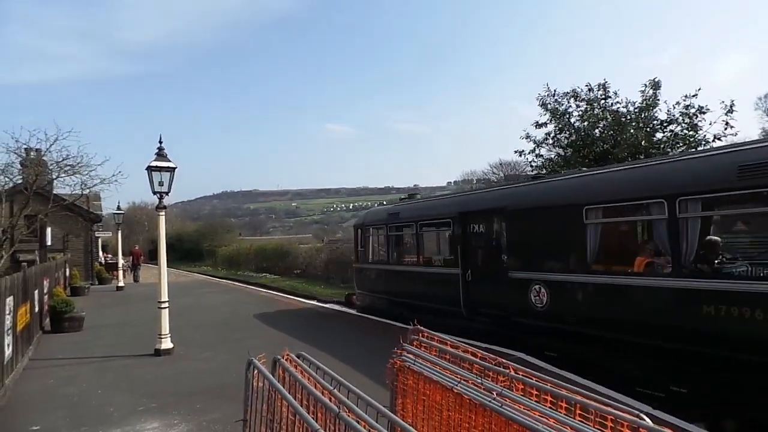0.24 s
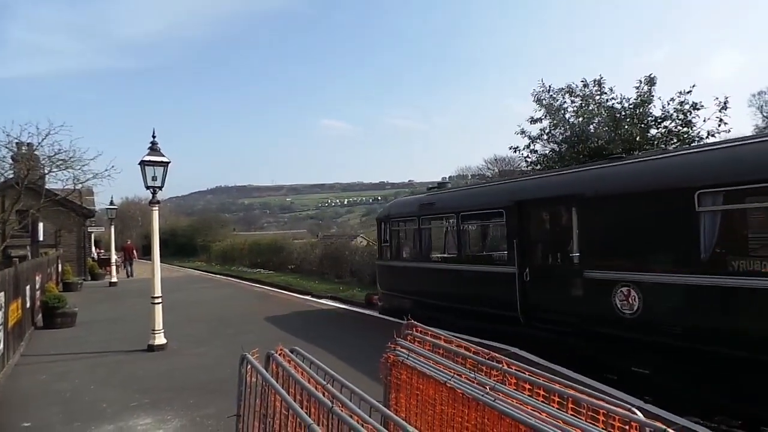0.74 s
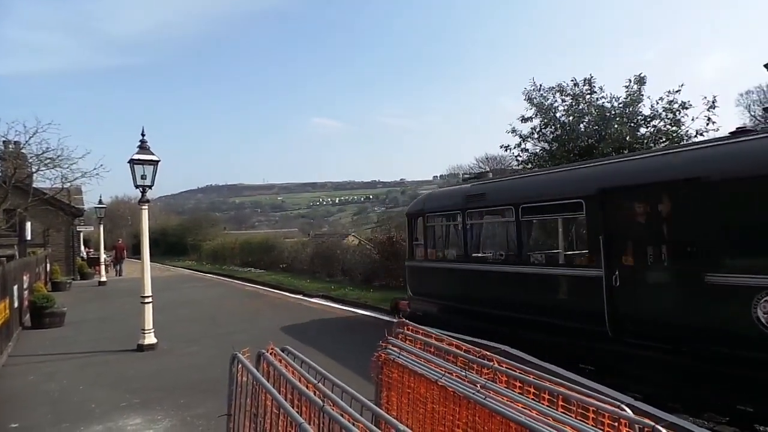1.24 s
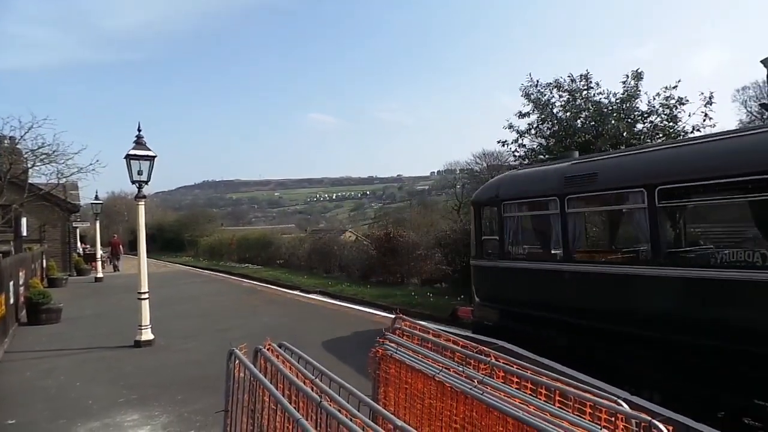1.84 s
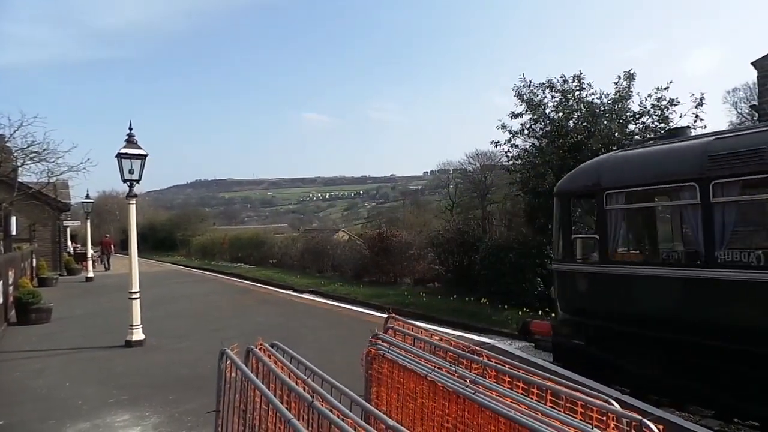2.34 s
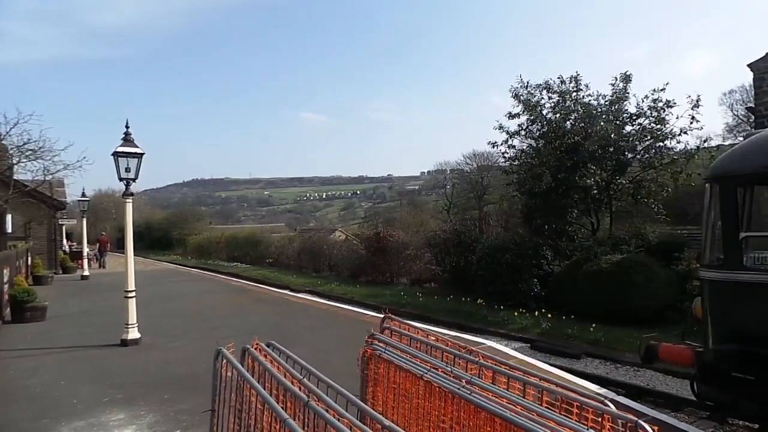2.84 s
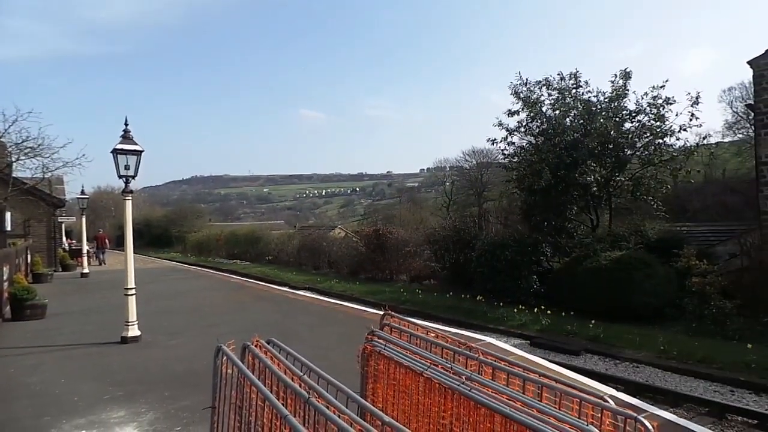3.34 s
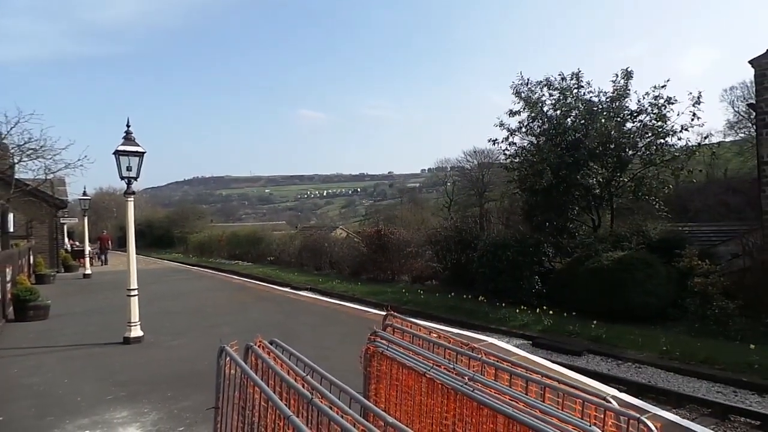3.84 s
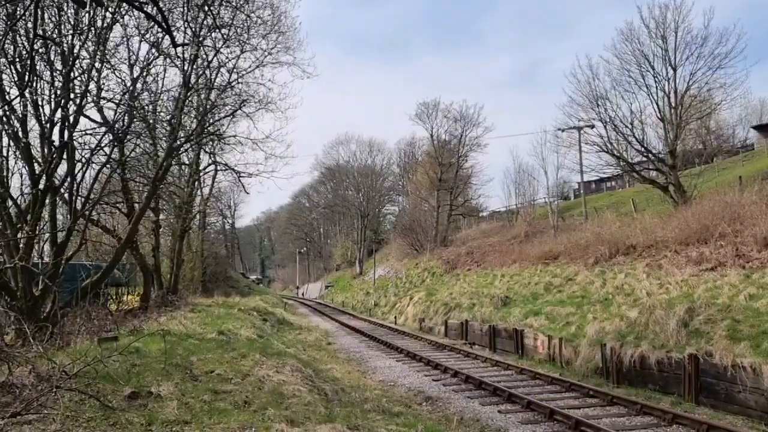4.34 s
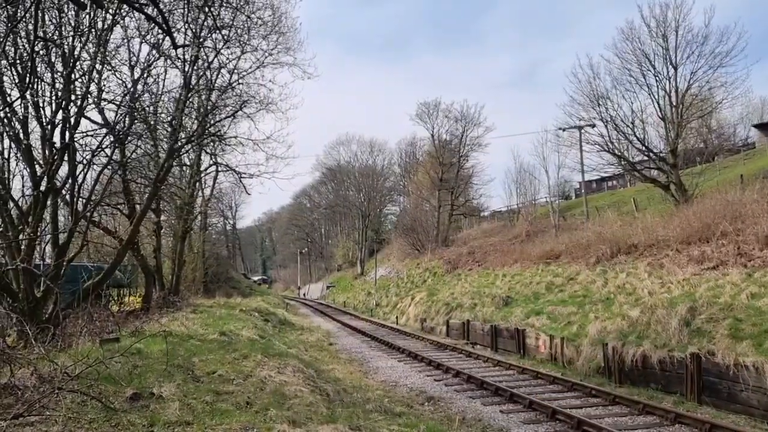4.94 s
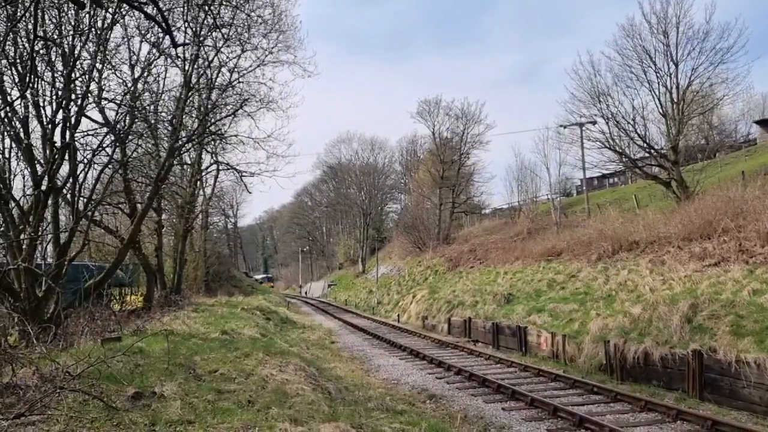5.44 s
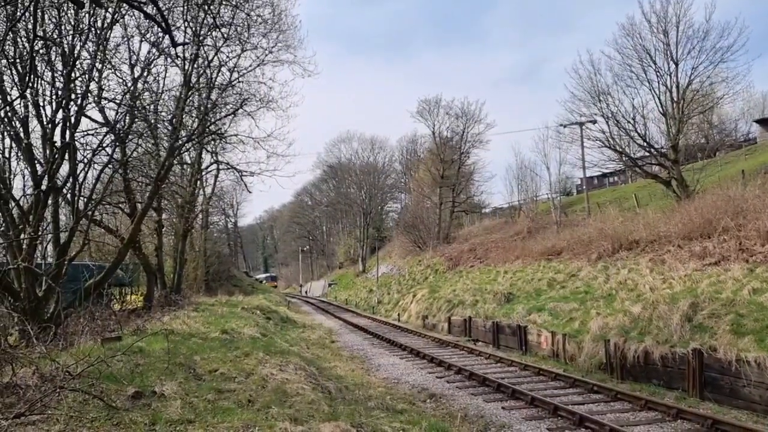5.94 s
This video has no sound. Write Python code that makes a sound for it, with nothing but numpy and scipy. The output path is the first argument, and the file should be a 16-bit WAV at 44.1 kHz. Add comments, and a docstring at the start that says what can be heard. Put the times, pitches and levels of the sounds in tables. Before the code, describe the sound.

Close beside an open station platform, a diesel railcar accelerates past. Its deep exhaust throbs and barks, climbing in pitch, with metallic engine knocking. Wheel roar, hiss and brief thin squeals build as the tail passes, and a second engine hums higher. Everything starts to fade, then cuts abruptly at about four seconds to a very quiet lineside with soft air, distant drone, tiny ticks and two birds.

```python
"""A throbbing, knocking diesel exhaust accelerates past: a two-engined railcar, metres from a platform. Rolling
wheels, their ringing and the second engine follow; then the scene cuts, with a faint click, to a quiet
lineside. There a distant drone, rustles, ticks and two birds are heard. Exhausts are harmonics of the firing
cycle, knocks are rings struck once a firing, wheels and drone are wandering resonances, rails and air are
coloured noise, birds are gliding whistles."""
import sys
import numpy as np
from scipy import signal
from scipy.fft import rfft, irfft
from scipy.io import wavfile
from scipy.ndimage import uniform_filter1d, minimum_filter1d, map_coordinates

SR = 44100
rng = np.random.default_rng(int(sys.argv[2]) if len(sys.argv) > 2 else 0)


def output_pcm(signal):
    """Save a mono or channel-first signal as 16-bit PCM at the path in sys.argv[1].

    Samples are clipped to [-1, 1] before scaling.
    """
    pcm = np.clip(np.atleast_2d(signal).T, -1, 1) * 32767
    wavfile.write(sys.argv[1], SR, np.round(pcm).astype(np.int16))


N = 273420
TIME = np.arange(N) / SR
PLATFORM_END_S, LINESIDE_START_S = 4.127, 4.153
TOP_HZ = 14300

# Lineside air and rustle spectra: (frequency [Hz], relative density [dB per Hz])
AIR_COLOUR = [(22, -2), (45, 22), (70, 17), (95, 16.5), (200, 2), (320, 0), (520, -5.5), (760, 0.5),
              (1130, -11.5), (1400, -8.5), (2900, -14), (4400, -20), (8000, -35.5), (14000, -39)]
RUSTLE_COLOUR = [(90, -12), (160, 3), (320, 1), (520, -5), (760, -3), (1100, -14), (1400, -7), (3000, -22),
                 (6000, -36)]
# Mean levels of the air and the distant drone: (time [s], level [dB])
AIR_LEVEL = [(4.33, -52), (4.6, -53.5), (5.1, -55), (5.55, -51.5), (5.8, -52)]
DRONE_LEVEL = [(4.3, -52), (4.41, -61), (4.53, -50), (4.85, -46.5), (5.3, -54.5), (6.2, -51.5)]
# Drone resonances: (frequency [Hz], width [Hz], relative level [dB])
DRONE_MODES = [(68, 2.4, 2.5), (58.5, 3, -7), (154, 10, -13.5), (314, 21, -23), (373, 25, -22),
               (716, 49, -25.5)]
# Soft stirrings of the air: (time [s], half-length [s], level [dB])
RUSTLES = [(4.355, .025, -63), (5.496, .028, -59), (5.6, .025, -64.5), (5.72, .03, -64)]
# Dry ticks, the first a faint click just as the scene cuts: (time [s], level before the gain in ticks() [dB],
# brightest frequency [Hz])
TICKS = [(4.1596, -69.5, 2580), (4.4002, -50, 4450), (5.9948, -53, 2700)]
# Small bird's thin falling notes and short chips, farther bird's fluted notes:
# (time [s], length [s], start before scoop [Hz], end before scoop [Hz], level [dB])
THIN_NOTES = [(4.15, 0.059, 6960, 6120, -76), (4.28, 0.11, 6660, 6100, -66), (4.438, 0.12, 6500, 6040, -64),
              (4.605, 0.11, 6720, 5940, -66.5)]
CHIPS = [(5.145, 0.033, 7800, 6620, -77), (6.002, .046, 7850, 5900, -67), (6.05, 0.027, 7350, 6770, -77)]
FLUTE_NOTES = [(4.24, 0.058, 1665, 1570, -67), (4.34, 0.18, 1714, 1630, -69),
               (4.515, 0.038, 1370, 1337, -69), (4.555, .035, 1623, 1594, -73.5),
               (4.61, 0.041, 1990, 1890, -70), (4.655, 0.037, 1650, 1620, -70),
               (4.91, .05, 2160, 2220, -75.5), (4.93, 0.17, 2300, 2490, -70),
               (5.06, 0.087, 2440, 2390, -69), (5.315, 0.052, 2120, 2096, -71),
               (5.435, 0.038, 2690, 2630, -69), (5.63, 0.064, 2670, 2680, -70.5),
               (5.715, 0.037, 2340, 2250, -71.5), (5.795, 0.04, 2180, 2155, -64),
               (5.86, 0.092, 2080, 2060, -71)]

# Rolling, rails under each bogie, clatter, hiss, knock: (frequency [Hz], relative density [dB per Hz])
ROLL_COLOUR = [(22, -25.5), (40, -2), (65, -1), (90, 4), (150, 7.5), (260, 5), (340, 6), (430, 0.5),
               (600, 0), (800, -5.5), (1200, -23)]
FRONT_RAIL_COLOUR = [(500, -20.5), (720, 8.5), (900, 8.5), (1030, -2), (1250, -7), (1800, -43)]
REAR_RAIL_COLOUR = [(400, -20.5), (525, 1), (580, -6.5), (660, 3.5), (810, 0), (940, 3), (1030, -1),
                    (1140, 2.5), (1300, -8), (1800, -38.5)]
CLATTER_COLOUR = [(1000, -29), (1500, 2), (1900, 2), (2200, -4.5), (2550, -4.5), (3100, -17), (4500, -45)]
HISS_COLOUR = [(1800, -13), (3000, 1.5), (4200, -1.5), (4900, -3), (5350, -1), (5800, -3.5), (8500, -5),
               (10000, -8.5), (11000, -15), (12000, -25.5), (14000, -40)]
KNOCK_COLOUR = [(700, -20.5), (1000, -1), (1150, -1), (1320, 4), (1480, -6), (2000, -21), (3500, -49)]
# Ringing wheel modes: (frequency [Hz], width [Hz], relative level [dB])
WHEEL_MODES = [(736, 16, -2.5), (691, 26, -5)]
# Brief singing of the wheels: (time [s], half-length [s], upper mode [dB], lower mode [dB])
SQUEALS = [(2.438, 0.026, -20, -40), (2.53, .035, -26, -27.5), (2.79, 0.02, -22.5, -42),
           (2.855, 0.021, -21.5, -40), (2.93, 0.014, -25.5, -36), (3.028, 0.011, -22, -36),
           (3.113, .028, -17.5, -33), (3.187, 0.026, -18.5, -22.5), (3.5, .02, -28, -27),
           (3.608, 0.019, -21, -22), (3.699, 0.033, -19.5, -23.5), (3.84, 0.041, -36, -27)]
# Hissing scrapes of steel on steel: (time [s], half-length [s], level [dB])
SCRAPES = [(0.204, 0.048, -43), (0.493, 0.024, -36), (.62, .03, -37.5), (0.83, 0.062, -36),
           (0.959, 0.032, -35), (1.81, 0.031, -37), (3.62, 0.028, -37), (3.864, 0.016, -34)]
# Leading and second engine: (time [s], firing rate [Hz])
FRONT_FIRING = [(0, 45.75), (0.11, 46.9), (0.52, 48.82), (1.37, 54.97), (1.94, 58.75), (2.57, 63.28),
                (3.05, 66.04), (3.35, 67.76), (3.65, 69.14), (3.9, 69.9), (4.12, 66.6)]
REAR_FIRING = [(2.7, 71.56), (3.5, 76.8), (3.83, 77), (4.1, 72.9)]
# Engine rattle, rising as it gathers speed: (time [s], centre [Hz])
RATTLE_PITCH = [(.7, 1079), (1.3, 1187), (1.9, 1294), (2.6, 1343)]
# Engine block modes rung by combustion: (frequency [Hz], relative level [dB])
BLOCK_MODES = [(1040, -4), (1180, 1), (1320, -1.5), (1560, -8.5), (1880, -5.5), (2500, -14.5)]
# Exhaust boom along the platform: (time [s], firing tone [dB], octave [dB])
BOOM = [(0, -17.5, -25), (.25, -16, -23), (.55, -18, -37), (.75, -19.5, -26), (.95, -22.5, -28),
        (1.35, -18, -19.5), (1.72, -18, -13), (2.1, -19.5, -17), (2.45, -27, -15.5), (2.72, -32, -18),
        (3.05, -28, -27.5), (3.35, -25, -24), (3.62, -25, -42), (4.1, -29.5, -25)]

# Pass-by of each source: abreast time, level there, rise and fall time scales, sideways beaming exponent
ROLL_PASS = dict(at_s=3.16, db=-19.5, rise_s=1.48, fall_s=0.66)
FRONT_BOGIE_PASS = dict(at_s=1.16, db=-27, rise_s=0.71, fall_s=0.98)
REAR_BOGIE_PASS = dict(at_s=3.45, db=-21, rise_s=0.64, fall_s=0.37)
CLATTER_PASS = dict(at_s=2.83, db=-27, rise_s=1.0, fall_s=1.9)
HISS_PASS = dict(at_s=2.22, db=-33.5, rise_s=1.17, fall_s=3.7)
RING_PASS = dict(at_s=0.9, db=-28.5, rise_s=0.8, fall_s=1.45, beam=2.4)
SING_PASS = dict(at_s=3.2, db=-29.5, rise_s=1.24, fall_s=0.9, beam=2.6)
REAR_PASS = dict(at_s=3.494, db=-21.5, rise_s=0.33, fall_s=0.56, beam=2.45)
REAR_HUM_PASS = dict(at_s=3.45, db=-27.5, rise_s=0.25, fall_s=0.43, beam=2.7)
BEAT_PASS = dict(at_s=1.77, db=-23.8, rise_s=1.0, fall_s=1.0, beam=2.65)
RATTLE_PASS = dict(at_s=2.05, db=-30, rise_s=0.6, fall_s=0.4, beam=2.2)
KNOCK_PASS = dict(at_s=2.74, db=-26.3, rise_s=0.55, fall_s=1.7)
HUM_PASS = dict(at_s=1.8, db=-25.5, rise_s=0.51, fall_s=0.48, beam=2.2)
THROB_PASS = dict(at_s=1.5, db=-7, rise_s=2.3, fall_s=1.5, beam=2.2)
BARK_PASS = dict(at_s=0.73, db=-15, rise_s=0.83, fall_s=0.52, beam=2.3)

SING_HIGH_HZ, SING_LOW_HZ, SING_LOW_REL_DB = 732.6, 667, -6
PIPE_HZ, PIPE_WIDTH_HZ = 163, 31
TAIL_S, TAIL_DB_PER_S = 3.645, 13


def undb(db):
    """Decibels to gain."""
    return 10 ** (np.asarray(db) / 20)


def unit(x):
    """Scale to rms 1."""
    return x / np.sqrt(np.mean(x ** 2))


def curves(table):
    """Table columns as signals, linear in time."""
    s, *columns = np.transpose(table)
    return [np.interp(TIME, s, column) for column in columns]


def walk(rate_per_s):
    """Smooth random wander of rms 1, about rate_per_s changes a second."""
    points = rng.standard_normal(4096)
    return unit(map_coordinates(points, [TIME * rate_per_s], order=3, mode="wrap"))


def noise(colour):
    """Gaussian noise of rms 1, its spectrum shaped by (frequency [Hz], density [dB])."""
    hz, db = np.transpose(colour)
    f_hz = np.arange(N // 2 + 1) * SR / N
    shape = undb(np.interp(np.log(f_hz + 1), np.log(hz), db))
    low_cut = f_hz > hz[0] / 2
    high_rolloff = 1 + (f_hz / hz[-1] / 2) ** 2
    return unit(irfft(rfft(rng.standard_normal(N)) * shape * low_cut / high_rolloff, N))


def ringing(modes):
    """Randomly pushed resonances, rms 1 in sum: each wanders in phase and a little in strength."""
    out = 0
    for hz, width_hz, db in modes:
        swing = walk(2 * width_hz) + 1j * walk(2 * width_hz)
        swing = swing / (np.abs(swing) + 0.32)  # evens out the strength
        phase = 2 * np.pi * np.cumsum(hz * np.ones(N)) / SR
        out = out + undb(db) * unit(np.real(swing * np.exp(1j * phase)))
    return unit(out)


def passing(at_s, db, rise_s, fall_s, beam=1):
    """Gain of a source going by: one over its distance, steeper if it beams sideways."""
    along = (TIME - at_s) / np.where(TIME < at_s, rise_s, fall_s)
    return undb(db) / np.hypot(1, along) ** beam


def with_flares(gain, flares):
    """Gain joined in power by Gaussian flares (time [s], half-length [s], level [dB])."""
    power = gain ** 2
    for s, half_s, db in flares:
        flare = undb(db) * np.exp(-((TIME - s) / half_s) ** 2 / 2)
        power = power + flare ** 2
    return np.sqrt(power)


def air():
    """Still country air: coloured noise, gently wandering in level."""
    return undb(curves(AIR_LEVEL)[0] + 1.1 * walk(14)) * noise(AIR_COLOUR)


def rustles():
    """Air stirring softly: brief swells of noise."""
    return with_flares(0, RUSTLES) * noise(RUSTLE_COLOUR)


def drone():
    """Far-off drone: randomly pushed resonances."""
    return undb(curves(DRONE_LEVEL)[0] + 1.3 * walk(18)) * ringing(DRONE_MODES)


def ticks(decay_s=0.002, gain_db=-7):
    """Tiny snaps: decaying noise bursts, each with its own brightness."""
    out = 0
    for s, db, hz in TICKS:
        envelope = (TIME >= s) * np.exp(-np.abs(TIME - s) / decay_s)
        colour = [(0.6 * hz, -20), (hz, 0), (1.5 * hz, -9), (3 * hz, -26)]
        out = out + undb(db + gain_db) * envelope * noise(colour)
    return out


def bird(notes, scoop, waver, echo_db, echo_t60_s, bend=2):
    """Whistles that scoop up, then settle (bend > 1) or dive (bend < 1), scattered back by the trees."""
    song, wobble = np.zeros(N), 1 + waver * walk(300)
    for s, length_s, start_hz, end_hz, db in notes:
        along = np.clip((TIME - s) / length_s, 0, 1)
        glide_hz = end_hz + (start_hz - end_hz) * (1 - along) ** bend
        hz = glide_hz * (1 - scoop * np.exp(-along / 0.054))
        swell = np.sqrt(4 * along * (1 - along))
        song += swell * undb(db) * np.sqrt(2) * np.sin(2 * np.pi * np.cumsum(hz * wobble) / SR)
    trees = rng.standard_normal(N) * undb(-60 * TIME / echo_t60_s)
    echo = signal.fftconvolve(song, trees / np.linalg.norm(trees))[:N]
    return song + undb(echo_db) * echo


def lineside():
    """Still air, rustles, ticks, a far-off drone and two birds."""
    thin = bird(THIN_NOTES, scoop=0.14, waver=0.005, echo_db=-17, echo_t60_s=0.3)
    chips = bird(CHIPS, scoop=0.06, waver=0.012, echo_db=-7, echo_t60_s=0.35, bend=0.6)
    flute = bird(FLUTE_NOTES, scoop=0.03, waver=0.018, echo_db=-2, echo_t60_s=0.55)
    return air() + rustles() + drone() + ticks() + thin + chips + flute


def rolling():
    """Wheels rolling: low coloured noise, unsteady in level."""
    return passing(**ROLL_PASS) * undb(1.0 * walk(25.03)) * noise(ROLL_COLOUR)


def rails(shake):
    """Two bogies roaring on the rails: a noise band each, shaken at the firing rate."""
    front = passing(**FRONT_BOGIE_PASS) * noise(FRONT_RAIL_COLOUR)
    rear = passing(**REAR_BOGIE_PASS) * noise(REAR_RAIL_COLOUR)
    return (1 + 0.07 * shake) * (front + rear) * undb(0.8 * walk(40))


def clatter(shake):
    """Running-gear clatter: a noise band shaken at the firing rate."""
    return (1 + 0.092 * shake) * passing(**CLATTER_PASS) * noise(CLATTER_COLOUR)


def hiss():
    """Steady high hiss, flaring in scrapes of steel on steel."""
    return with_flares(passing(**HISS_PASS), SCRAPES) * undb(0.5 * walk(70)) * noise(HISS_COLOUR)


def squeals(waver_rad=0.52, flutter_db=2.15):
    """A slipping wheel sings two nearly pure tones, which flare as the flange bites."""
    s, half_s, high_db, low_db = np.transpose(SQUEALS)
    steady = passing(**SING_PASS)
    modes = [(SING_HIGH_HZ, steady, high_db), (SING_LOW_HZ, steady * undb(SING_LOW_REL_DB), low_db)]
    out = 0
    for hz, gain, db in modes:
        level = with_flares(gain, zip(s, half_s, db)) * undb(flutter_db * walk(40))
        out = out + level * np.sin(2 * np.pi * hz * TIME + waver_rad * walk(30))
    return np.sqrt(2) * out


def wheels():
    """Wheels: randomly pushed modes, plus squeals."""
    return passing(**RING_PASS) * ringing(WHEEL_MODES) + squeals()


def firings(hz, jitter_cycles, start=0):
    """Running count of firings; each comes slightly early or late."""
    return start + np.cumsum(hz) / SR + jitter_cycles * walk(60)


def harmonic(cycle, hz, order, silencer_hz=142, width_hz=62):
    """One partial of the exhaust pulse, rms 1, delayed in phase by the silencer's resonance."""
    lag_rad = np.arctan2(order * hz * width_hz, silencer_hz ** 2 - (order * hz) ** 2)
    return -np.sqrt(2) * np.cos(2 * np.pi * order * cycle - lag_rad)


def piped(cycle, hz, order):
    """A partial through the tailpipe's resonance: loudest at its centre, lagging more above it."""
    detune = 2 * (order * hz - PIPE_HZ) / PIPE_WIDTH_HZ
    lag_cycles = np.arctan(detune) / (2 * np.pi * order)
    return harmonic(cycle - lag_cycles, hz, order=order) / (1 + detune ** 2)


def rear_exhaust():
    """Second engine's third and fourth harmonics emerge as the tail of the car goes by."""
    hz = curves(REAR_FIRING)[0]
    cycle = firings(hz, jitter_cycles=0.0018)
    main = passing(**REAR_PASS) * harmonic(cycle, hz, order=3)
    return main + passing(**REAR_HUM_PASS) * harmonic(cycle, hz, order=4)


def block_knocks(cycle, lead_cycles=0.6, attack_s=0.00087, decay_s=0.0079, weak_db=-3,
                 scatter_db=1.4, detune=0.039, uneven_db=1.2):
    """Each combustion rings the block ahead of its exhaust pulse; alternate blows weak, none alike."""
    count, part = np.divmod(cycle + lead_cycles, 1)
    count, age_s = count.astype(int), part / curves(FRONT_FIRING)[0]
    out = 0
    for hz, db in BLOCK_MODES:
        size, pitch, phase = rng.standard_normal((count[-1] + 1, 3))[count].T
        tone = np.sin(2 * np.pi * (hz * (1 + detune * pitch) * age_s + phase))
        out = out + undb(db + scatter_db * size) * tone
    envelope = (1 - np.exp(-age_s / attack_s)) * np.exp(-age_s / decay_s)
    envelope = envelope * np.minimum(10 * (1 - part), 1)  # closes before the next blow
    return unit(out * undb(weak_db * (count % 2) + uneven_db * walk(24)) * envelope)


def engine_knock(cycle):
    """Combustion knocks, a rattle of rising pitch and a knocking-band noise."""
    rattle = ringing([(curves(RATTLE_PITCH)[0], 130, 0)])
    return (passing(**BEAT_PASS) * block_knocks(cycle) + passing(**RATTLE_PASS) * rattle
            + passing(**KNOCK_PASS) * noise(KNOCK_COLOUR))


def bark(cycle, lead_cycles=0.095, weak_db=-11, scatter_db=1.5, low_hz=172, high_hz=268, order=3):
    """Each firing kicks the tailpipe into a short ring, harder under load; alternate kicks are weak."""
    count = np.floor(cycle + lead_cycles)
    kicks = np.diff(count, prepend=count[0]) * undb(weak_db * (count % 2) + scatter_db * walk(51))
    pipe = signal.butter(order, [low_hz, high_hz], "bandpass", fs=SR, output="sos")
    load_db = np.interp(TIME, [0.232, 0.282], [-3.5, 0])
    return -undb(load_db) * unit(signal.sosfilt(pipe, kicks))


def front_exhaust(cycle, half_db=-16):
    """Boom, throb climbing through the pipe's resonance, hum and bark; firings alternate in strength."""
    hz = curves(FRONT_FIRING)[0]
    tone_db, octave_db = curves(BOOM)
    limp = np.cos(np.pi * cycle)
    boom = undb(tone_db) * harmonic(cycle, hz, order=1) + undb(octave_db) * harmonic(cycle, hz, order=2)
    boom = boom * (1 + 0.042 * limp)
    throb = piped(cycle, hz, order=3) * (1 + 0.076 * limp + 0.015 * walk(46))
    throb = throb + undb(half_db) * piped(cycle, hz, order=2.5)
    load_db = np.interp(TIME, [0.11, 0.33], [-21.75, -7.25])  # hardens as the engine takes up the load
    hum = harmonic(cycle, hz, order=4) * (1 + 0.25 * walk(25))
    return (boom + passing(**HUM_PASS) * hum + passing(**THROB_PASS) * undb(load_db) * throb
            + passing(**BARK_PASS) * bark(cycle))


def railcar():
    """Exhausts, knock in time with the firings, and wheels on rails; most die away behind the tail."""
    cycle = firings(curves(FRONT_FIRING)[0], jitter_cycles=0.0052, start=0.4934)
    shake = np.cos(2 * np.pi * cycle)
    jolts = undb(0.6 * walk(36))  # uneven track
    running_gear = jolts * (clatter(shake) + rails(shake))
    tail = undb(-TAIL_DB_PER_S * np.maximum(TIME - TAIL_S, 0))
    fading = tail * (running_gear + hiss() + engine_knock(cycle) + front_exhaust(cycle))
    return rolling() + wheels() + rear_exhaust() + fading


def scene():
    """The platform fades out quickly; after an instant of silence the lineside follows."""
    platform = np.clip((PLATFORM_END_S - TIME) / 0.02, 0, 1)
    country = np.clip((TIME - LINESIDE_START_S) / 0.0038, 0, 1)
    return (country * lineside() + platform * railcar())[None]


def record(dry, ceiling=0.97):
    """A limiter eases down the loudest peaks, then a steep low-pass cuts the top."""
    allowed = ceiling / np.maximum(np.abs(dry), ceiling)
    gain = uniform_filter1d(minimum_filter1d(allowed, size=441), size=441)  # 10 ms windows
    low_pass = signal.ellip(8, 0.2, 70, TOP_HZ, fs=SR, output="sos")
    return signal.sosfilt(low_pass, gain * dry)


dry = scene()
out = record(dry)
output_pcm(out)
```